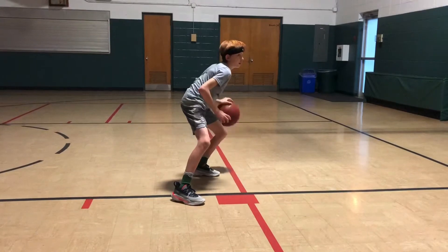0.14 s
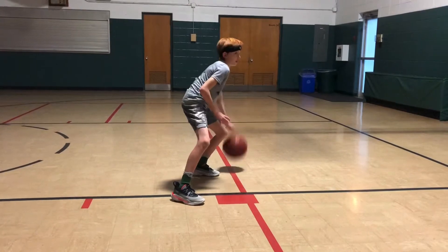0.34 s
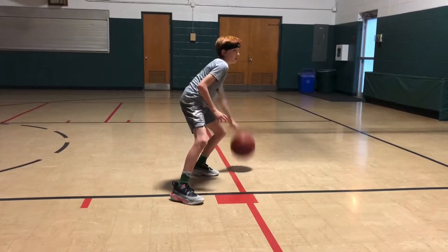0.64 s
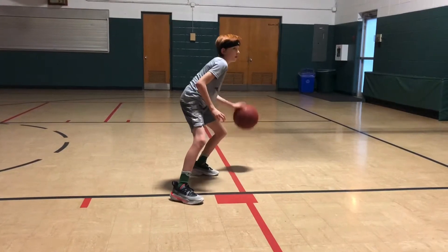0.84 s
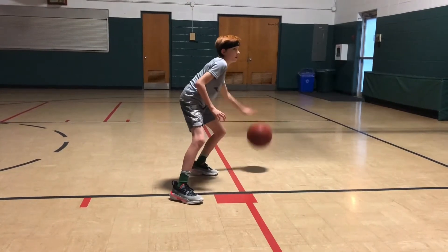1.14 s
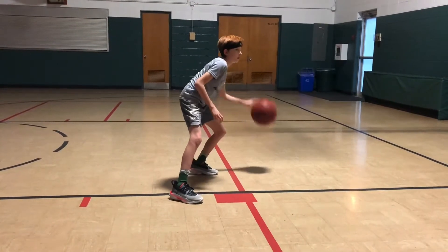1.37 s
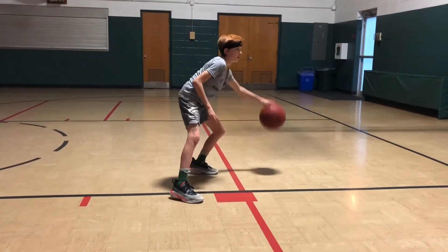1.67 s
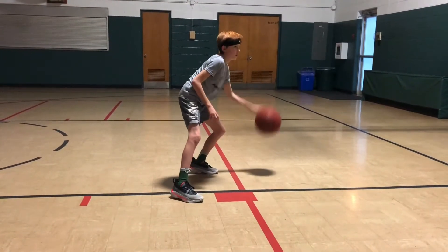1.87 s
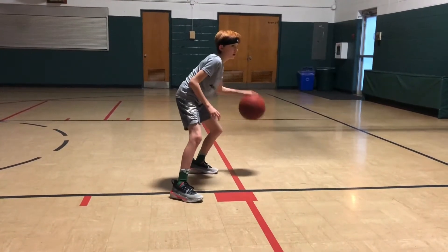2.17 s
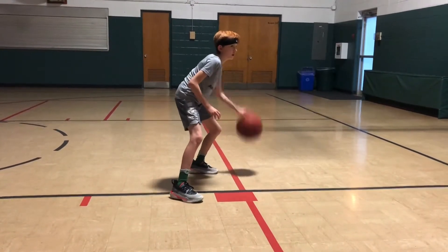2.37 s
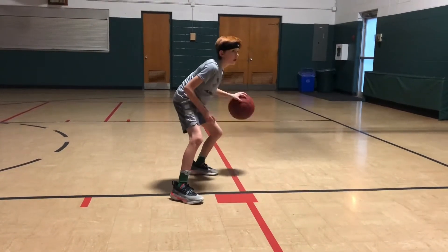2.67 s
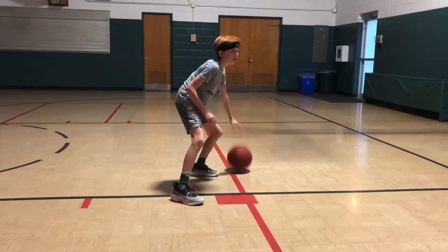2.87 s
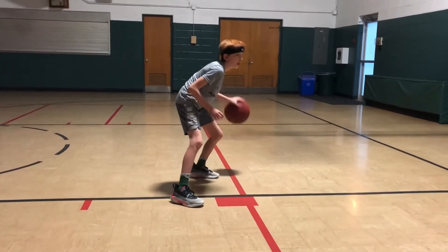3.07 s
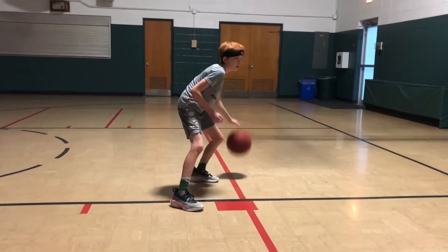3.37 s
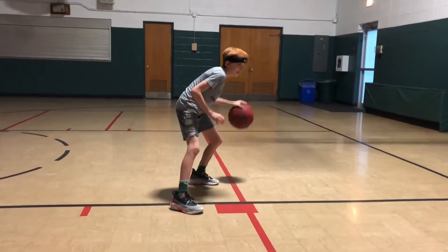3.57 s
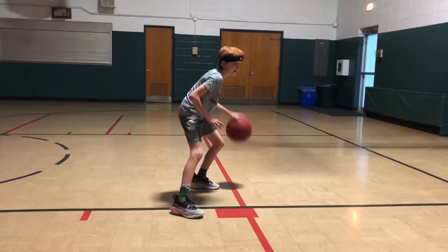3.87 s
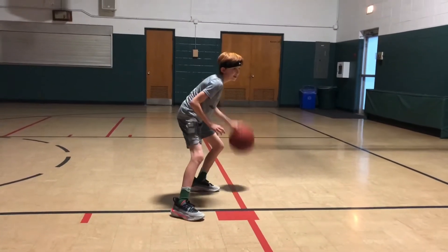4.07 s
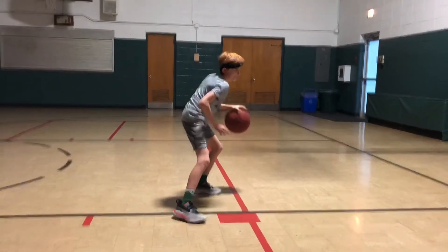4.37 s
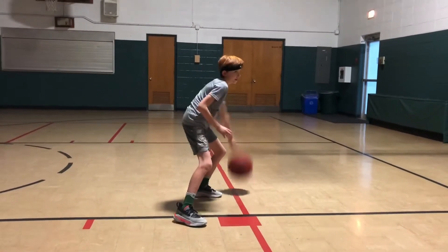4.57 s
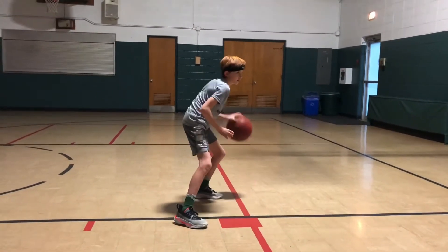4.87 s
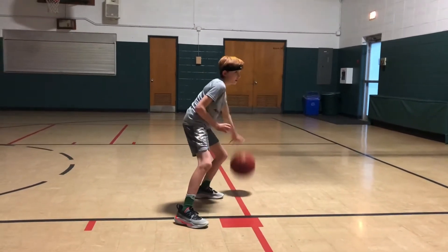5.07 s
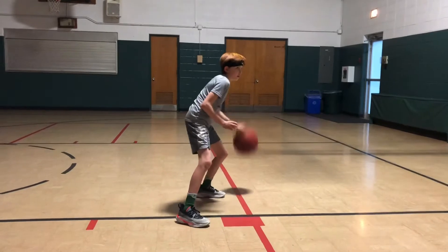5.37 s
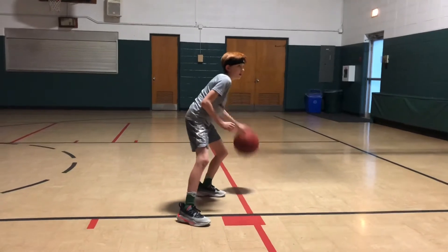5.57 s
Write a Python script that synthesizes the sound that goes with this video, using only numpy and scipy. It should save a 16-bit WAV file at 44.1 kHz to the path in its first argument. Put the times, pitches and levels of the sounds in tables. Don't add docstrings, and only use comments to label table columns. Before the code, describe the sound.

A basketball is dribbled steadily on a wooden gym floor, each sharp slap ringing briefly and washing into long hall reverberation over a faint hum.

```python
import sys
import numpy as np
from scipy import signal
from scipy.fft import rfft, irfft, next_fast_len
from scipy.io import wavfile
from scipy.ndimage import uniform_filter1d, map_coordinates

SR = 44100
rng = np.random.default_rng(int(sys.argv[2]) if len(sys.argv) > 2 else 0)


def master_out(mix):
    frames = np.transpose(np.atleast_2d(mix))
    ceiling = np.clip(frames, -1, 1)
    pcm = np.round(ceiling * 32767).astype(np.int16)
    wavfile.write(sys.argv[1], SR, pcm)


def convert_level_to_amplitude(level_db):
    exponent = np.asarray(level_db, float) / 20
    return 10 ** exponent


N = 251811
LEAD = SR


def add(out, s, x):
    i = LEAD + int(s * SR)
    out[i:i + len(x)] += x


def bands(hz, size):
    octave = np.log2(np.maximum(np.fft.rfftfreq(size, 1 / SR), 1))
    centres = np.log2(np.r_[hz[0] / 2, hz, SR / 2])
    ripple = uniform_filter1d(rng.standard_normal(len(octave)), size=50) * 50 ** .5
    noise = rfft(rng.standard_normal(size)) * convert_level_to_amplitude(1.6 * ripple)
    split = []
    for hat in np.eye(len(centres))[1:-1]:
        gain = np.sqrt(np.interp(octave, centres, hat))
        split.append(irfft(noise * gain, size))
    y = np.array(split)
    return y / y.std(axis=1, keepdims=True)


def hall():
    # (frequency [Hz], level [dB], t60 [s], swell [s])
    wash_bands = [(45.9, -56, 3.5, .03), (68, -56, 0.99, 0.014), (112, -49, 3.9, 0.017),
                  (173, -49, 4.5, 0.24), (244, -47.5, 1.66, 0.026), (408, -54.5, 1.53, 0.0094),
                  (443, -51.5, 3.3, 0.0042), (633, -57, 1.17, 0.017), (950, -56, 2.5, 0.0064),
                  (1150, -51, 4.2, 0.013), (1580, -48.5, 2.93, 0.035), (1770, -53.5, 3.6, 0.014),
                  (2700, -55, 4.1, 0.016), (4500, -55, 3.1, 0.029), (6620, -57, 1.8, 0.016),
                  (9120, -60, 1.06, 0.034), (12200, -63.5, 0.65, 0.015), (15550, -65, 0.62, .015)]
    table_hz, *columns = np.transpose(wash_bands)
    hz = np.geomspace(table_hz[0], table_hz[-1], num=44)
    db, t60, swell = (np.interp(np.log(hz), np.log(table_hz), c)[:, None] for c in columns)
    wash_s = 1.6
    t = np.arange(int(wash_s * SR)) / SR
    fade = np.clip((wash_s - t) / .3, 0, 1)
    envelope = convert_level_to_amplitude(db - 4) * (1 - np.exp(-(t / swell) ** 2)) * 1000. ** (-t / t60) * fade
    return hz, bands(hz, 1 << 17), envelope


def wash(room, bass_db, low_db, ring_db, mid_db, top_db):
    hz, noise, envelope = room
    size = envelope.shape[1]
    start = rng.integers(noise.shape[1] - size)
    colour_hz = [170, 230, 420, 900, 1150, 1600, 2000, 2800, 4500]
    levels_db = [bass_db, low_db, low_db, 0, ring_db, ring_db, mid_db, mid_db, top_db]
    colour_db = np.interp(np.log(hz), np.log(colour_hz), levels_db)
    bloom_db, bloom_s = 1.65, 0.0391
    knots = rng.standard_normal((11, 64))
    band_axis, time_axis = np.arange(len(hz)) / 4.4, np.arange(0, size, 64) / SR / bloom_s
    where = np.meshgrid(band_axis, time_axis, indexing="ij")
    blooms = map_coordinates(knots, where, order=1, mode="mirror")
    bloom_gain = np.repeat(convert_level_to_amplitude(bloom_db * blooms), 64, axis=1)[:, :size]
    y = convert_level_to_amplitude(colour_db) @ (envelope * bloom_gain * noise[:, start:start + size])
    clumps = uniform_filter1d(rng.standard_normal(size), size=160) * 160 ** .5
    return y * convert_level_to_amplitude(3.04 * clumps * np.exp(-np.arange(size) / SR / 0.2))


def fan():
    # (frequency [Hz], level per band [dB])
    air = [(40, -87), (120, -44), (300, -66), (1000, -61.5), (4000, -78), (10000, -83.5), (16000, -94)]
    hz, db = np.transpose(air)
    return convert_level_to_amplitude(db) @ bands(hz, next_fast_len(N))[:, :N]


def ring(hz, t60, size=2048):
    t = np.arange(size) / SR
    return np.sin(2 * np.pi * hz * t) * 1000. ** (-t / t60)


def rasp(envelope, top_hz):
    noise = envelope * rng.standard_normal(len(envelope))
    return signal.lfilter(*signal.butter(1, [1500, top_hz], "band", fs=SR), noise)


def crack(skin_hz, low_db, treble_db):
    # (frequency [Hz], level [dB], t60 [s])
    skin_modes = [(4455, 26, 0.00062), (2256, -1, 0.0026), (7210, 0.5, 0.00085), (11200, -10.5, 0.00093),
                  (14100, -15, 0.0012)]
    hz, db, t60 = np.transpose(skin_modes)
    hz = hz * np.r_[skin_hz / hz[0], 1 + .08 * rng.standard_normal(len(hz) - 1)]
    db = db + low_db * (hz < 3000) + treble_db * (hz > 6200)
    y = sum(convert_level_to_amplitude(d) * ring(f, t) for f, d, t in zip(hz, db, t60))
    t = np.arange(len(y)) / SR
    y = y * (1 - np.exp(-(t / .0002) ** 2))
    y = y / np.abs(y).max()
    return y + convert_level_to_amplitude(-13) * rasp(np.exp(-t / .0012), 9000)


def slap(skin, ring_db, ring_hz, treble_db, again_ms, again_db):
    first, second = (crack(*skin, treble_db + 18.5) for _ in range(2))
    t = np.arange(len(first)) / SR
    cavity = convert_level_to_amplitude(ring_db) * (1 - np.exp(-t / 0.0008)) * ring(ring_hz, 0.008)
    again = np.roll(second, int(again_ms * SR / 1000))
    return first + convert_level_to_amplitude(again_db) * again + cavity


def add_modes(out, s, loose_db):
    # (frequency [Hz], level [dB], t60 [s])
    lasting_modes = [(161.55, -32.5, 0.59), (335, -20.5, 0.027), (432, -26.5, 0.061), (475, -35.5, 0.23),
                     (572, -65, 0.015), (615, -33.5, 0.056), (836, -38, 0.057), (1165, -22, 0.033),
                     (1514, -5, 0.009)]
    swell = 1 - np.exp(-np.arange(16384) / SR / 0.0029)
    chances = rng.standard_normal((len(lasting_modes), 2))
    for (hz, mode_db, t60), c in zip(lasting_modes, chances):
        gain = convert_level_to_amplitude(mode_db + 0.21 * loose_db + 2.84 * c[0])
        add(out, s + 0.000772, gain * swell * ring(hz * (1 + 0.021 * c[1]), t60, size=16384))


def thump(hz, swell_s):
    t = np.arange(4096) / SR
    return np.sin(2 * np.pi * hz * t) * t / swell_s * np.exp(-t / swell_s)


def add_thumps(out, s, push_db):
    # (delay [s], level [dB])
    booms = [(.0022, -0.5), (.0076, 6), (0.0189, 2.5), (0.0385, -4.5), (0.0461, -5), (0.0586, -4.5),
             (0.097, -16), (0.15, -10.5), (0.174, -4), (0.1866, -6.5), (0.2267, -3.5), (0.265, -8),
             (0.2784, -8.5)]
    for delay, boom_db in booms:
        add(out, s + delay, convert_level_to_amplitude(push_db + boom_db - 14.5) * thump(130.2, 0.0047))


def peel(lift_s):
    t = np.arange(1024) / SR - lift_s
    return rasp(np.exp(np.where(t < 0, t / 0.0031, -t / 0.00048)), 5600)


def add_lift(out, s, skin, ring_hz, treble_db, lift_db):
    lift_s = .0103
    add(out, s, convert_level_to_amplitude(lift_db - 5) * peel(lift_s))
    add(out, s + lift_s, convert_level_to_amplitude(lift_db) * slap(skin, 11.4, ring_hz, treble_db, 0.24, -22))


def add_ceiling(out, s, skin, ring_hz, treble_db, again_ms, again_db, fullness_db):
    skin_hz, low_db = skin
    above_db = -15.5 + 0.48 * fullness_db
    echo = slap((skin_hz, low_db - 1), -5, ring_hz, treble_db, again_ms, again_db - 6)
    add(out, s, convert_level_to_amplitude(above_db) * echo)
    beams = rasp(np.exp(-np.arange(1024) / SR / 0.0016), 9100)
    add(out, s, convert_level_to_amplitude(above_db - 8.5) * beams)


def add_walls(out, s, db, sound):
    # (delay [s], level [dB], top frequency [Hz])
    walls = [(.0285, -27, 9000), (.0325, -28, 4000), (.038, -29, 8000), (.051, -25, 12000),
             (.0635, -28, 14000), (.067, -27, 14000), (.077, -26, 2500), (.112, -27, 1900),
             (.163, -31, 1700)]
    for (delay, wall_db, top_hz), c in zip(walls, rng.standard_normal((len(walls), 2))):
        dull = signal.lfilter(*signal.butter(3, top_hz, fs=SR), sound)
        rough = rng.standard_normal(96) * np.exp(-np.arange(96) / 30)
        gain = convert_level_to_amplitude(db + wall_db - 12 + 1.5 * c[1])
        add(out, s + delay + .0006 * c[0], gain * np.convolve(dull, rough))


def bounce(out, room, s, db, low_db, ring_db, knock_db):
    # (time [s], reach of the ball from the body [0-1], push [dB])
    player = [
        (0.6, 0, -0.5),
        (1.0, 0.69, -1),
        (1.45, 0.8, -1.5),
        (2.35, 0.2, 1.5),
        (2.8, 0.06, 0.5),
        (4.1, 0.68, 3),
        (5.4, 0.04, 3),
    ]
    times, reaches, pushes = np.transpose(player)
    reach, push_db = np.interp(s, times, reaches), np.interp(s, times, pushes)
    chance = rng.standard_normal(3)

    near_hz, far_hz = 4620, 3570
    skin = near_hz + (far_hz - near_hz) * reach, low_db
    bright_db = 0.15 * low_db
    treble_db = bright_db - 8
    fullness_db = db + low_db + 2
    loose_db = knock_db + 19
    ring_hz = 1298 * (1 + .06 * chance[0])
    again_ms, again_db = max(.9 + .3 * chance[1], .4), -11

    sound = slap(skin, ring_db - db, ring_hz, treble_db, again_ms, again_db)
    add(out, s, convert_level_to_amplitude(db) * sound)
    add_modes(out, s, loose_db)
    add(out, s + 0.0025, convert_level_to_amplitude(knock_db) * thump(225, 0.0038))
    add_thumps(out, s, push_db)
    add_lift(out, s, skin, ring_hz, treble_db, -26 + 2.5 * chance[2])
    above_s = s + .0185 - .001 * reach
    add_ceiling(out, above_s, skin, ring_hz, treble_db, again_ms, again_db, fullness_db)
    add_walls(out, s, db, sound)

    wash_low_db = 2.5 * reach + 0.087 * loose_db
    wash_ring_db = 0.36 * (ring_db + 11)
    wash_top_db = 0.87 * (db + 6 + bright_db)
    reverb = wash(room, push_db, wash_low_db, wash_ring_db, 0.68 * fullness_db, wash_top_db)
    add(out, s, convert_level_to_amplitude(1.5) * reverb)


def scene():
    # (time [s], slap [dB], low skin re slap [dB],
    # ring of the air [dB], board knock [dB])
    earlier = [
        (-.94, -2, -9, -10, -21),
        (-.55, -3, 1, -19, -21),
        (-.15, -4, -0.5, -14, -21),
    ]
    bounces = [(0.2413, -8, -2.5, -6.5, -18.5), (0.6106, -7.5, -3.5, -2.5, -22),
               (1.0002, -6, 3, -12.5, -18.5), (1.4477, -11.5, 10.5, -6, -15.5),
               (1.9075, -5.5, 3, -10, -4.5), (2.3880, -4.5, 5.5, -8.5, -14.5),
               (2.8124, -8, 8, -10.5, -18.5), (3.2415, -6.5, 3, -6, -17), (3.6714, -3.5, 3.5, -10, -11.5),
               (4.093, -1.5, 3, -6, -12.5), (4.543, -2.5, 3, -4.5, -14.5), (4.9636, -6, 3.5, -10.5, -15),
               (5.4, -3.5, 6, -10, -15.5)]
    out, room = np.zeros(3 * LEAD + N), hall()
    for row in earlier + bounces:
        bounce(out, room, *row)
    return (out[LEAD:LEAD + N] + fan())[None]


def roll_off(x):
    return signal.sosfilt(signal.butter(12, 17090, fs=SR, output="sos"), x)


def record(dry):
    x = signal.sosfilt(signal.butter(4, 48, "high", fs=SR, output="sos"), dry)
    x = signal.sosfilt(signal.ellip(5, .5, 15, 15800, fs=SR, output="sos"), x)
    x = signal.sosfilt(signal.ellip(6, .5, 50, 16900, fs=SR, output="sos"), x)
    return roll_off(x)


dry = scene()
out = record(dry)
master_out(out)
```